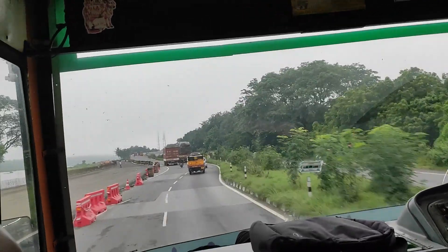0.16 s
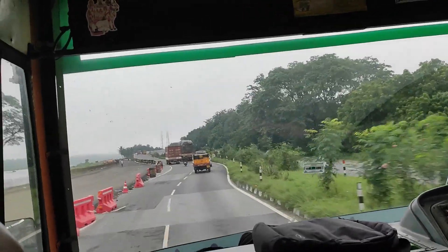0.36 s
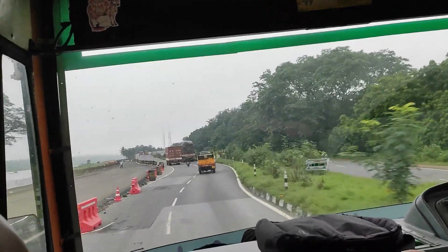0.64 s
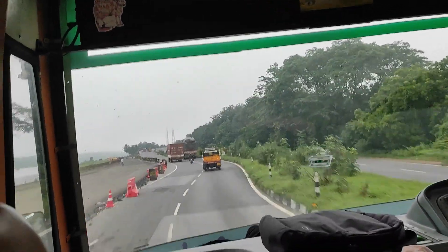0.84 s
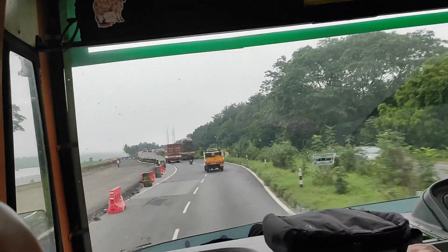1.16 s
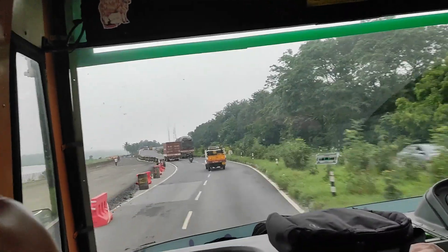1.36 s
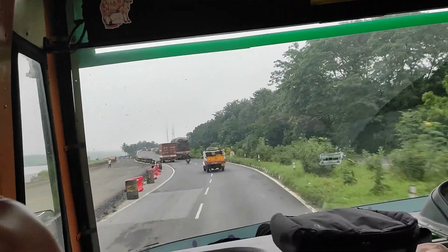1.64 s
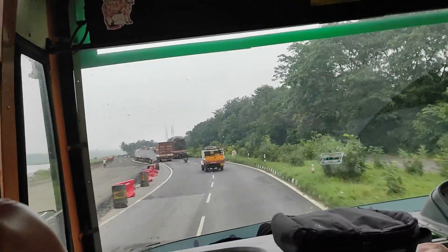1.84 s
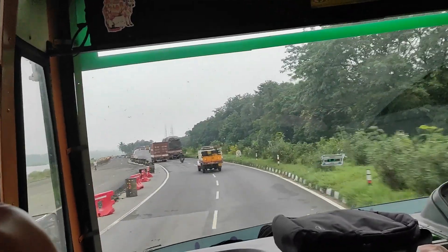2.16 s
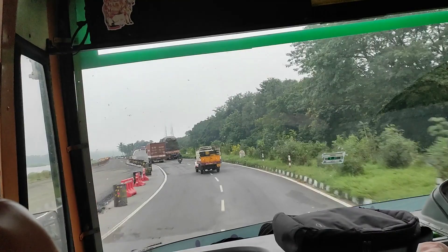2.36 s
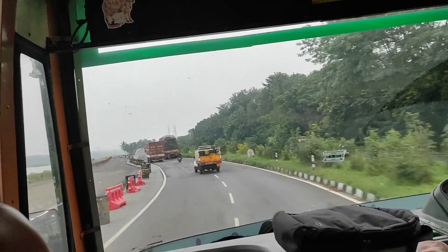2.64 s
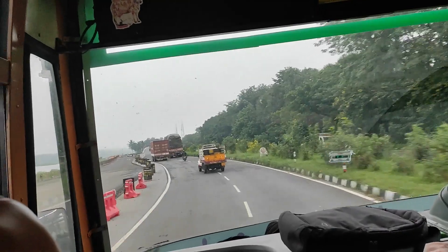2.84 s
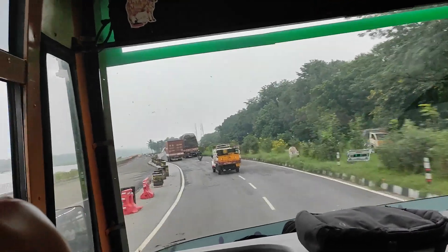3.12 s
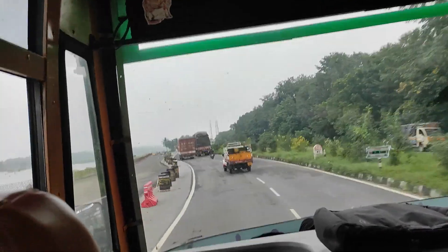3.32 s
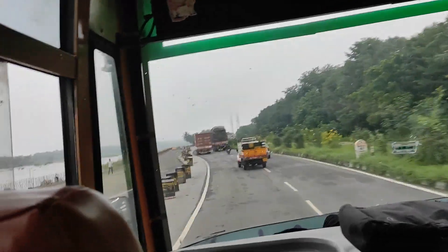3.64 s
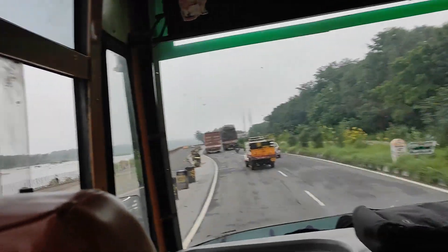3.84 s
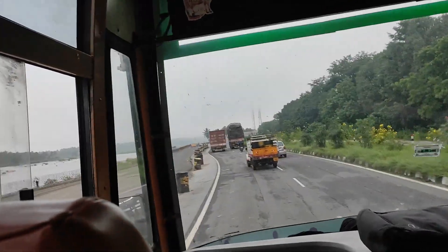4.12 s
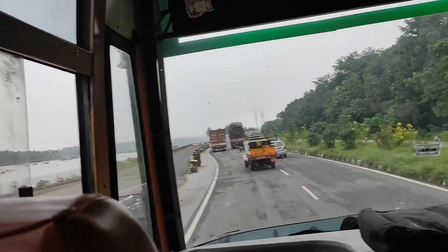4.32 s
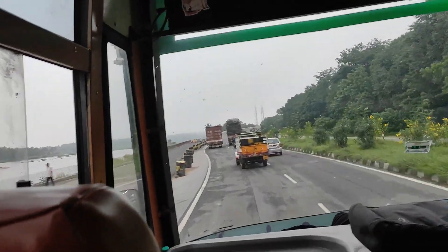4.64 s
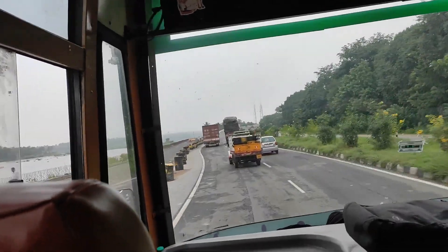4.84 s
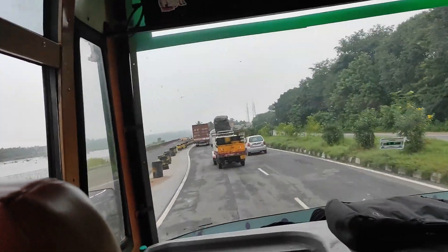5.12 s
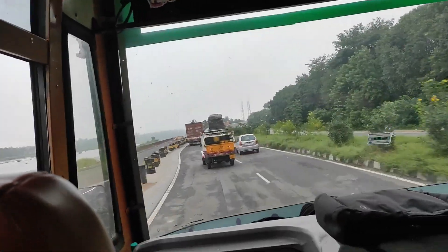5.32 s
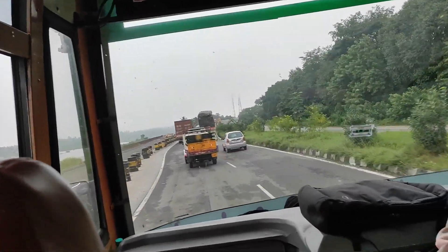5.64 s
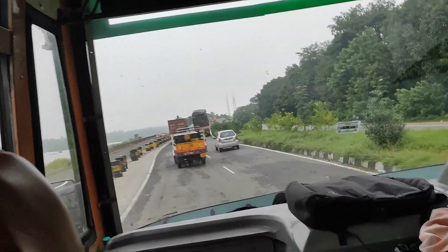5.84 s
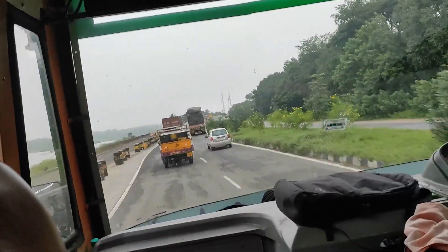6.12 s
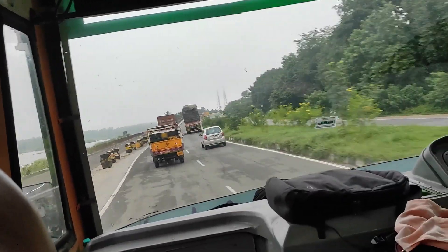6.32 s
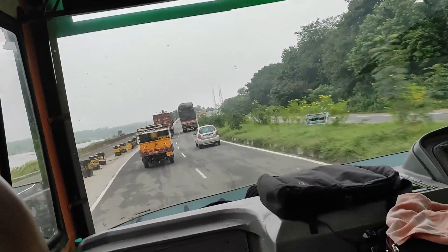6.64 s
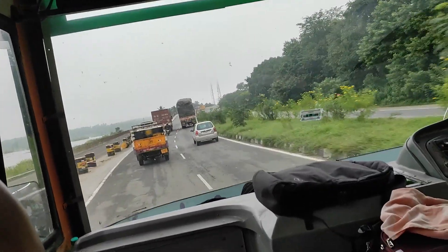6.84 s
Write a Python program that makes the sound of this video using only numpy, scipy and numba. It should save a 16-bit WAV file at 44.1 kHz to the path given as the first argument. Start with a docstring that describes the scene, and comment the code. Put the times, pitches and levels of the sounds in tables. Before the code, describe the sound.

Inside a bus on a highway, engine and tyres rumble, fittings rattle, and an air horn blares once, briefly.

```python
"""A deep boom and a steady roar fill the cab of a bus on an open highway, heard through a phone.
The road shakes the cabin air like a drum, engine and tyres roar through the floor, and bumps rattle
the fittings and knock a loose panel. An air horn hisses, flutters and blares once as air drives its
diaphragm (a thin metal disc), making the phone turn its volume down. A hollow knock follows."""
import sys
import numpy as np
from scipy import signal
from scipy.fft import rfft, irfft, next_fast_len
from scipy.io import wavfile
from scipy.ndimage import uniform_filter1d
from numba import njit

SR = 44100
rng = np.random.default_rng(int(sys.argv[2]) if len(sys.argv) > 2 else 0)


def dump(signal):
    """Clip the signal to [-1, 1] and save it as 16-bit WAV at the path in sys.argv[1]."""
    limited = np.clip(np.atleast_2d(signal).T, -1, 1)
    pcm = np.round(limited * 32767).astype(np.int16)
    wavfile.write(sys.argv[1], SR, pcm)


N = 307813
TIME = np.arange(N) / SR
SIZE = next_fast_len(N)
FREQ = np.arange(SIZE // 2 + 1) * SR / SIZE + 1e-3
SIDES = np.array([[1], [-1]])  # left, right
VALVE_OPENS_S, VALVE_SHUTS_S = 2.74, 2.922  # the horn's air supply


def horn():
    """Air escapes; the diaphragm flutters at a second pitch, then locks to the note of the horn's tube."""
    # how each part comes and goes: name -> delay/s, rise/s, level/dB, sag/(dB/s), fall/(dB/s)
    shapes = { "fundamental": (.06, .04, 0, 25, 330), "afterring": (.16, .03, -11, 0, 115),
              "overtones": (.064, .055, 6.5, 10, 800), "overtones return": (.195, .015, 10, 0, 750),
              "flutter": (.05, .05, -4, 260, 600), "side tone": (.058, .045, -5, 130, 600),
              "rasp": (.066, .03, 5.5, 270, 400), "closing rasp": (.17, .02, -11, 0, 420),
              "first leak": (.003, .03, -27, 20, 600), "air": (.07, .035, -21, 40, 450)}
    note_hz, relaxed_hz, flutter_hz = 295.3, 305, 718
    on = np.flatnonzero((TIME > VALVE_OPENS_S) & (TIME < VALVE_SHUTS_S + .23))
    part = {name: horn_envelope(*row)[on] for name, row in shapes.items()}
    # as the valve shuts, the lowest tone slides up and the overtones jump for an instant
    since_shut = TIME - VALVE_SHUTS_S
    low_hz = relaxed_hz + (note_hz - relaxed_hz) * np.exp(-np.clip(since_shut + .01, 0, None) / .015)
    jump_hz = 5 * np.exp(-(since_shut / .009) ** 2)
    blown_hz = note_hz + jump_hz + .5 * waver(150)  # swirling air makes the cycles uneven
    phase, low_phase = 2 * np.pi * np.cumsum([blown_hz[on], low_hz[on]], axis=1) / SR
    low_tone = np.sqrt(2) * np.sin(low_phase) * undb(-3 * SIDES)
    blare, smear = horn_overtones(phase, note_hz, TIME[on])
    # the flutter mixes with the note, adding tones above and below itself
    flutter_phase = 2 * np.pi * np.cumsum(flutter_hz + 8 * waver(80)[on]) / SR
    flutter = np.cos(flutter_phase) + .24 * np.cos(flutter_phase - phase)
    rasp = 1.2 * smear + .49 * blare * np.cos(flutter_phase)
    # hiss of escaping air: f/Hz, level/dB
    air = [(1000, -5), (3000, -8), (6500, -13), (8300, -4.5), (10000, -8), (12500, -4.5), (14400, -8)]
    out = np.zeros((2, N))
    out[:, on] = ((part["fundamental"] + part["afterring"]) * low_tone
                  + (part["overtones"] + part["overtones return"]) * blare
                  + part["flutter"] * flutter
                  + part["side tone"] * np.cos(flutter_phase + phase)
                  + (part["rasp"] + part["closing rasp"]) * rasp
                  + (part["first leak"] + part["air"]) * unit(irfft(mic_noise() * colour(air), SIZE)[:, on]))
    return out


def horn_overtones(phase, note_hz, times):
    """Tones at multiples of the note, in two forms: a clear blare, and a smear from uneven cycles."""
    # lower overtones: multiple, level/dB, left minus right/dB, left's head start/rad
    lower = [(2, -6, 4, 2.6), (3, -.5, -3, .15), (4, -5, -9, 1.6), (5, -3, 6, 2.2), (6, 1, -5.5, -1),
             (7, 1, -8, 2.4), (8, -5.5, 0, -.3), (9, -7, -1, -3), (10, -6, -4.5, 2.2), (11, -7, -1, -2.1),
             (12, -11.5, 0, .2), (13, -6.5, 3, -1.6), (14, -14.5, 1, .1), (15, -21, 0, 2), (16, -22, 0, .1),
             (17, -16.5, -1, 1.5), (18, -17.5, 6, 5.5), (19, -16, 5, 2), (20, -20, 0, 8)]
    # strength of the higher overtones: f/Hz, level/dB
    top = [(6000, -18.5), (8000, -19), (9500, -28.5), (11500, -28), (14000, -30)]
    upper = [(k, read_at(top, k * note_hz) + 2 * level, 3 * balance, 3 * lead)
             for k, (level, balance, lead) in zip(range(21, 49), rng.standard_normal((28, 3)))]

    def wobble(count):
        """Random values joined by straight lines across the blast."""
        return np.interp(times, np.linspace(times[0], times[-1], count), rng.standard_normal(count))

    blare = smear = 0
    for k, db, balance_db, lead in lower + upper:
        gain = undb(db + SIDES * balance_db / 2)
        angle = k * phase + lead * SIDES / 2 + rng.uniform(0, 2 * np.pi)
        blare += gain * undb(2 * wobble(20)) * np.sin(angle)
        smear += gain * (wobble(160) * np.sin(angle) + wobble(160) * np.cos(angle))
    return unit(blare), unit(smear)


def horn_envelope(delay_s, rise_s, db, sag_db_per_s, fall_db_per_s):
    """Loudness of one part of the horn: it rises, sags while blown and falls once the valve shuts."""
    start = VALVE_OPENS_S + delay_s
    rise = np.sin(np.pi / 2 * np.clip((TIME - start) / rise_s, 0, 1)) ** 2
    held_s = np.clip(np.minimum(TIME, VALVE_SHUTS_S) - start - rise_s, 0, None)
    shut_s = np.clip(TIME - VALVE_SHUTS_S, 0, None)
    return rise * undb(db - sag_db_per_s * held_s - fall_db_per_s * shut_s)


def cab_echo(sound, echo_db=-18, fade_s=.08):
    """The small cab rings briefly after a sound, fading by 60 dB in fade_s."""
    tail = rng.standard_normal(SR // 2) + .38 * rng.standard_normal((2, SR // 2))
    tail *= undb(-60 * TIME[:SR // 2] / fade_s)
    tail /= np.sqrt(np.sum(tail[0] ** 2))
    return sound + undb(echo_db) * signal.fftconvolve(sound, tail, axes=1)[:, :N]


def panel_knocks():
    """A loose panel cracks, then shudders dully for a moment; every knock also rings its hollow, each at its
    own level."""
    # knocks: t/s, shudder level/dB, length/s, rise/s, hollow ring level/dB
    knocks = [(1.238, -29, 0.035, .006, -32), (1.566, -24, 0.049, 0.0055, -31),
              (2.475, -37, .027, .006, -30), (3.317, -19.5, 0.069, .0015, -18),
              (6.252, -24.5, 0.038, 0.0074, -39), (6.324, -28.5, .04, .01, -44)]
    # pitches at which the panel rings: f/Hz, width/Hz, level/dB
    modes = [(381, 79, -1.5), (646, 204, -4.5), (865, 310, -8), (1100, 130, -5), (1430, 350, -15.5),
             (2180, 1240, -25)]
    ring = sum(undb(db) * (-1) ** k * resonance(hz, width) for k, (hz, width, db) in enumerate(modes))
    starts, db, lengths, rise, hollow_db = np.transpose(knocks)
    crack = noise(resonance(2800, width_hz=2400) ** 2) * bursts(starts, db - 14, .031, rise)
    hollow = noise(resonance(618, width_hz=74) ** 2) * bursts(starts, hollow_db, lengths, rise)
    shudder = noise(ring) * bursts(starts, db, lengths, rise)
    return shudder + hollow + crack


def cabin_boom():
    """The cabin air booms like a drum under the road's pushes."""
    # strength of the boom: t/s, level/dB
    pushes = [(0, -3), (.1, -19.5), (.2, -11), (.32, -13), (.38, -14.5), (.46, -7.5), (.62, -20.5),
              (.9, -13), (1.15, -13.5), (1.55, -8), (1.75, -14), (2.04, -9.5), (2.18, -17), (2.37, -8.5),
              (2.62, -21), (2.76, -9.5), (3.15, -16), (3.4, -11), (3.58, -8.5), (3.85, -19.5), (4.12, -12),
              (4.27, -24), (4.4, -13), (4.52, -16), (4.65, -7.5), (4.79, -14), (4.91, -3), (4.99, -13.5),
              (5.1, -9.5), (5.28, -13.5), (5.45, -13), (5.56, -20), (5.65, -9.5), (5.79, -20.5),
              (5.87, -12), (5.95, -18.5), (6.07, -8.5), (6.19, -22), (6.31, -11.5), (6.45, -17),
              (6.63, -20), (6.72, -14.5), (6.84, -26), (6.95, -12), (6.98, -16)]
    # its deep tone: f/Hz, level/dB
    spectrum = [(5, -9), (10, -9.5), (18, -3), (26, -3.5), (34, -5), (44, -6.5), (52, -10), (60, -32)]
    boom = signal.hilbert(irfft(mic_noise() * colour(spectrum), SIZE))[:, :N]
    # one resonance swings more evenly than noise does, so partly flatten the loudness
    boom = unit(boom.real / np.abs(boom.mean(axis=0)) ** .6)
    gain = undb(curves(pushes)[0] + 2.2 * waver(22))
    return signal.sosfiltfilt(signal.butter(4, 52.8, fs=SR, output="sos"), gain * boom)


def road_noise():
    """Rumble and engine roar through the floor, tyre rush and air at the windows; gusts move them all."""
    # slow swells: t/s, bass/dB, middle/dB, treble/dB
    swells = [(0, -1.5, 0, -1), (0.479, 2, 0, -1), (.65, 1, 4, 2.5), (1.15, 2, 4, 5), (1.36, 0, 4.5, 4.5),
              (1.46, 0, 9.5, 5), (1.54, 0, 7, 8), (1.62, 1, 5.5, 5.5), (1.9, -1, 5, 5.5),
              (2.3, 0.5, 5, 5.5), (2.44, -3, 6.5, 7), (2.55, -2, 3, 3.5), (2.73, 0.5, 5.5, 7.5),
              (3.1, -1.5, 4, 4), (3.2, -0.5, -1, -2), (3.43, 0, -1.5, -0.5), (3.55, 3, 3, 1),
              (3.85, -2, -0.5, 4.5), (4.15, -1, -2, 1), (4.5, -0.5, -3, 0), (5, 3, 0.5, 5.5),
              (5.5, -1, -2.5, 0.5), (6.1, -1.5, -4, -2), (6.36, -2, -6, -1.5), (6.52, -3.5, -1.5, 1.5),
              (6.62, 0, 0.5, 4.5), (6.8, 1, 0, 6), (6.98, -1, 0, 7)]
    # the tone of each of five layers: f/Hz, level/dB
    rumble = [(33, -55), (56, -11), (70, -3.5), (110, -6), (156, -12.5), (187, -12.5), (260, -18.5),
              (340, -28), (570, -120)]
    roar = [(150, -17), (260, -6.5), (317, -0.5), (354, 1.5), (522, -5.5), (578, -4), (1070, -7.5),
            (1190, -12), (1500, -13.5), (1950, -23), (3300, -120)]
    rush = [(880, -22), (1500, -3), (2540, -6.5), (2850, -8), (3160, -10), (4200, -13.5), (5460, -25.5),
            (9240, -120)]
    hiss = [(2470, -37), (4200, -33), (4480, -3), (5280, -3), (5810, -1.5), (7200, -1), (8800, -12.5),
            (11400, -50), (19400, -120)]
    leaks = [(5180, -32), (8800, -3), (9800, -6), (12600, -1), (13600, -6), (14200, -3)]
    # those layers in order: level/dB, swell it follows, share of that swell, flicker/dB
    layers = [(-23, "bass", 0.83, 2), (-31, "middle", 0.51, 0.74), (-39, "middle", 0.91, 0.32),
              (-50, "treble", 0.97, 0.5), (-54.5, "treble", 0.57, -0.5)]
    swell_db = dict(zip(("bass", "middle", "treble"), curves(swells)))
    gust = undb(.6 * waver(12))
    out = 0
    for (db, band, share, flicker_db), spectrum in zip(layers, (rumble, roar, rush, hiss, leaks)):
        out += undb(db + share * swell_db[band]) * flickering_noise(spectrum, flicker_db)
    return gust * out


def engine():
    """The engine whines and whistles as it pulls, drones as it coasts and growls as it pulls again."""
    # chattering whines: f/Hz, width/Hz, level/dB, chatter/dB
    whine_bands = [(283.4, 11.6, -40.5, 1.5), (350.5, 10, -47.5, 4.5), (1080, 47, -45.5, 4),
                   (2286, 76, -48, 3.5), (2862, 210, -44.5, 3.5), (6780, 520, -53.5, 2.5),
                   (12300, 900, -64, 2)]
    # how hard the engine pulls, added to the whines' level: t/s, level/dB
    load = [(0, -23), (.45, -27), (.75, -4), (1.15, 0), (1.45, 1.5), (1.9, -0.5), (2.7, 0.5), (3.3, -28),
            (6.4, -21), (6.7, -8), (6.98, -3)]
    # air intake growl as the throttle opens: t/s, level/dB
    growl_levels = [(6.45, -65), (6.65, -50), (6.85, -42), (6.98, -46)]
    # airy whistle that comes with the load: t/s, level/dB
    whistle_levels = [(0, -59), (.5, -55), (.85, -48), (1.22, -41.5), (1.45, -44), (1.8, -46), (2.7, -46),
                      (3.0, -71), (6.5, -65), (6.98, -45)]
    # drone of the drive line off throttle: t/s, f/Hz, relative level/dB
    coasting = [(4.8, 184, -60), (5.2, 182.9, -41), (5.7, 181, -29.5), (6.1, 179.7, -32.5),
                (6.45, 178.7, -29.5), (6.7, 180, -48)]
    source = mic_noise()

    def band(hz, width_hz, db, chatter_db, rate):
        """Noise around one pitch, its loudness trembling at random."""
        gain = undb(db + chatter_db * waver(rate))
        return gain * unit(irfft(source * resonance(hz, width_hz) ** 2, SIZE)[:, :N])

    whines = sum(band(*row, rate=65) for row in whine_bands) * undb(curves(load)[0])
    growl = band(hz=1660, width_hz=150, db=curves(growl_levels)[0], chatter_db=2.7, rate=20)
    whistle = band(hz=5210, width_hz=550, db=curves(whistle_levels)[0], chatter_db=1.6, rate=30)
    drone_hz, drone_db = curves(coasting)
    drone_gain = undb(drone_db - 1 + 3 * waver(22))
    drone_phase = 2 * np.pi * np.cumsum(drone_hz + 6 * waver(30)) / SR
    return whines + whistle + growl + drone_gain * np.sqrt(2) * np.sin(drone_phase)


def fittings(small_bumps_per_s=10):
    """Big bumps set off a grainy rattle and a very high squeak; small random ones add faint rattles."""
    # big bumps: t/s, rattle level/dB, length/s, squeak level/dB
    bumps = [(0.747, -38, .045, -56), (1.193, -36, .055, -75), (1.422, -35.5, 0.07, -75),
             (1.57, -37, 0.054, -75), (3.615, -43, .035, -51), (3.855, -58, .04, -54),
             (4.246, -44, .036, -51), (5.005, -38, 0.039, -50), (5.094, -33, 0.034, -50),
             (5.119, -33, 0.056, -53), (5.18, -36, 0.038, -55), (5.28, -39.5, 0.097, -51),
             (5.407, -42, .035, -55), (5.46, -44, .035, -50), (5.67, -38, 0.028, -48),
             (5.848, -43, 0.032, -70), (5.947, -41, .05, -64), (6.02, -43, 0.044, -60),
             (6.06, -43, .045, -58), (6.255, -53, 0.032, -56), (6.33, -43, 0.044, -64),
             (6.47, -46, .03, -53)]
    # tone of the rattle: f/Hz, level/dB
    spectrum = [(500, -20), (1000, -14), (2000, 2), (4000, -1), (7500, -3.5), (9500, -13.5), (12500, -11),
                (14400, -15)]
    starts, rattle_db, lengths, squeak_db = np.transpose(bumps)
    when, strength = rng.random((int(N / SR * small_bumps_per_s), 2)).T
    shakes = bursts(starts, rattle_db, lengths, rise_s=.008)
    shakes += bursts(when * N / SR, -57 + 7 * strength, length_s=.025, rise_s=.0027)
    rattle = noise(colour(spectrum)) * undb(.8 * waver(120))
    squeak = noise(resonance(13100, width_hz=60))
    return rattle * shakes + squeak * bursts(starts, squeak_db, .99 * lengths, rise_s=.0074)


def mic_noise(left_lag_s=.000288):
    """Noise spectra at the two microphones: alike in the bass, unrelated in the treble, the left late."""
    # how alike the sides are: f/Hz, likeness (1 = the same)
    likeness = [(60, 1), (130, 0.93), (280, 0.91), (620, 0.68), (1340, -0.09), (2910, 0), (6320, 0.04),
                (13700, 0)]
    # which side is louder: f/Hz, left minus right/dB
    balance = [(25, 0.5), (60, 0.5), (120, 3.5), (220, -2), (400, 0.5), (700, 1), (1200, -1), (2300, 0),
               (4100, -4.5), (7500, 2.5), (13700, -3.5)]
    common, apart = rfft(rng.standard_normal((2, SIZE)))
    alike = np.clip(read_at(likeness, FREQ), 0, 1)
    pair = np.sqrt(1 + alike) * common + np.sqrt(1 - alike) * apart * SIDES
    delay = np.exp(-1j * np.pi * FREQ * left_lag_s * SIDES)
    return pair * undb(SIDES * read_at(balance, FREQ) / 2) * delay


def noise(tone):
    """Steady stereo noise shaped by a gain for each frequency."""
    return unit(irfft(mic_noise() * tone, SIZE)[:, :N])


def flickering_noise(spectrum, flicker_db):
    """Noise split into octave-wide bands, each flickering on its own."""
    source, out = mic_noise() * colour(spectrum), 0
    low_hz, high_hz = spectrum[0][0], spectrum[-1][0]
    octave = np.log2(FREQ / low_hz)
    for k in range(int(np.log2(high_hz / low_hz)) + 2):
        band = np.cos(np.pi / 2 * np.clip(octave - k, -1, 1)) ** 2
        out += irfft(source * band, SIZE)[:, :N] * undb(flicker_db * waver(13))
    return unit(out)


def bursts(starts, levels_db, length_s, rise_s):
    """Loudness curve of events that rise fast and die away."""
    out = np.zeros(N)
    for start, db, length, rise in np.broadcast(starts, levels_db, length_s, rise_s):
        span = slice(int(start * SR), int((start + 4 * length) * SR))
        age = np.clip(TIME[span] - start, 0, None)
        out[span] += undb(db) * (1 - np.exp(-age / rise)) * np.exp(-(age / length) ** 2)
    return out


def waver(rate):
    """A smooth random curve of size about 1 that takes `rate` new values a second."""
    hold = int(SR / rate)
    steps = np.repeat(rng.standard_normal(N // hold + 1), hold)
    return unit(uniform_filter1d(uniform_filter1d(steps, hold), hold)[:N])


def resonance(hz, width_hz):
    """Gain at each frequency for something that rings at one pitch."""
    return 1 / (1 + 1j * (FREQ - hz ** 2 / FREQ) / width_hz)


def colour(table):
    """Gain at each frequency from a table of levels, silent beyond its ends."""
    return undb(read_at(table, FREQ)) * (FREQ > table[0][0]) * (FREQ < table[-1][0])


def read_at(table, hz):
    """A table's value at any frequency, with octaves evenly spaced."""
    freqs, values = np.transpose(table)
    return np.interp(np.log(hz), np.log(freqs), values)


def curves(table):
    """A table's columns, joined by straight lines in time."""
    times, *columns = np.transpose(table)
    return [np.interp(TIME, times, column) for column in columns]


def undb(db):
    """Decibels to gain."""
    return 10 ** (np.asarray(db) / 20)


def unit(x):
    """Scale to an average (rms) level of 1."""
    return x / np.sqrt(np.mean(x ** 2))


@njit
def follow(x, attack_s, release_s):
    """Track a level, rising over attack_s and falling over release_s."""
    out, level = np.empty(len(x)), 0.
    for i in range(len(x)):
        level += (x[i] - level) / (SR * (attack_s if x[i] > level else release_s))
        out[i] = level
    return out


def scene():
    """Everything that reaches the phone's two microphones."""
    return cabin_boom() + road_noise() + engine() + fittings() + panel_knocks() + cab_echo(horn())


def record(dry, limit_db=-9.5, ahead_s=.0087, top_hz=14250):
    """The phone turns everything down under the loud horn, rounds the peaks and cuts the top treble."""
    above_bass = signal.sosfilt(signal.butter(4, 220, "high", fs=SR, output="sos"), dry)
    power = uniform_filter1d(np.mean(above_bass ** 2, axis=0), size=160)
    level = follow(np.sqrt(power + 1e-12), attack_s=.0041, release_s=.052)
    coming_level = np.interp(TIME + ahead_s, TIME, level)
    gain = np.minimum(1, undb(limit_db) / (coming_level + 1e-9))
    rounded = np.tanh(.8 * gain * dry) / .8
    return signal.sosfilt(signal.ellip(14, .2, 90, top_hz, fs=SR, output="sos"), rounded)


dry = scene()
out = record(dry)
dump(out)
```